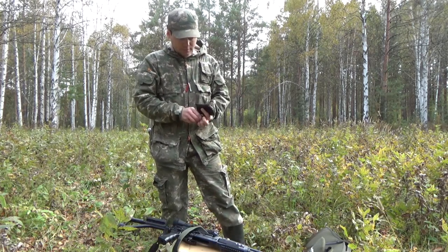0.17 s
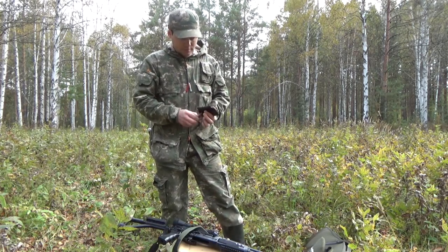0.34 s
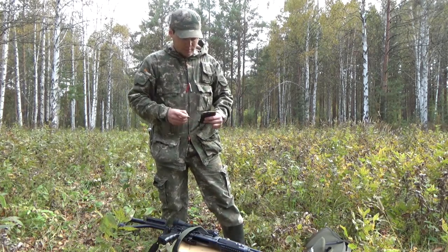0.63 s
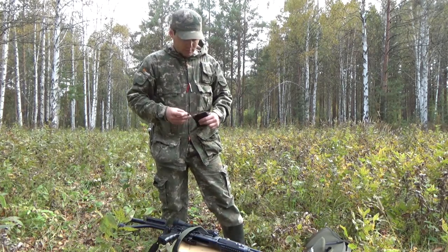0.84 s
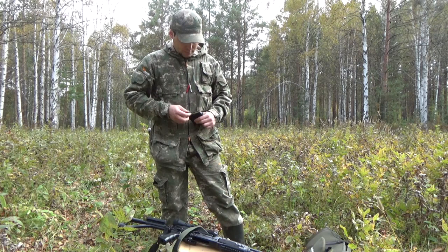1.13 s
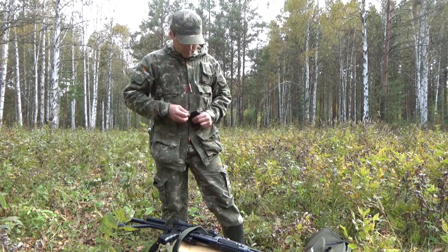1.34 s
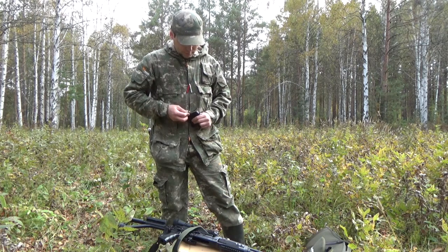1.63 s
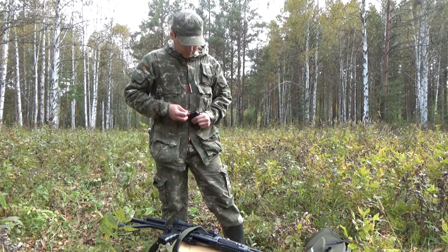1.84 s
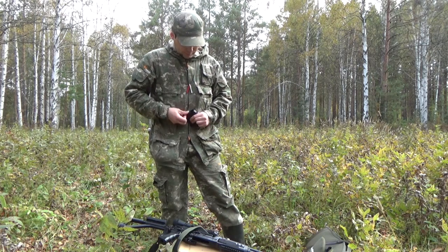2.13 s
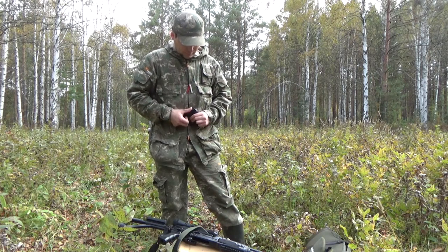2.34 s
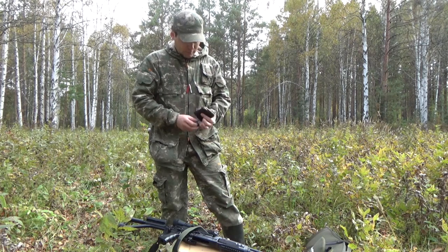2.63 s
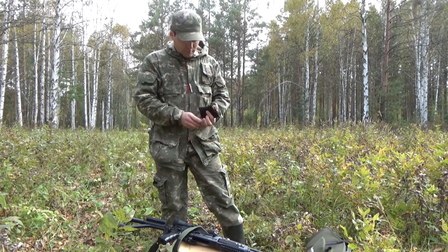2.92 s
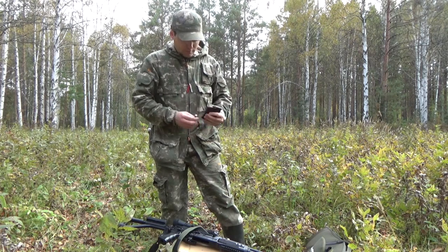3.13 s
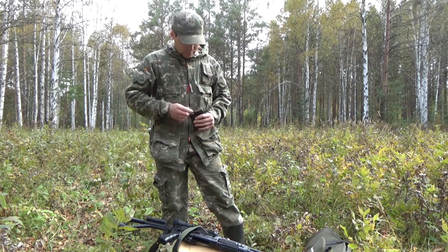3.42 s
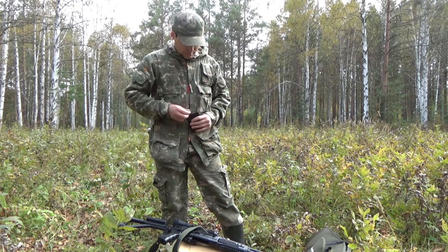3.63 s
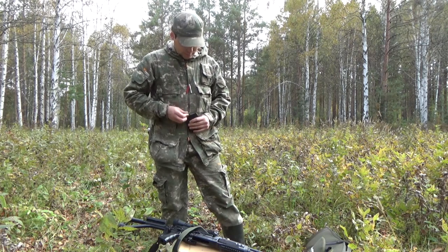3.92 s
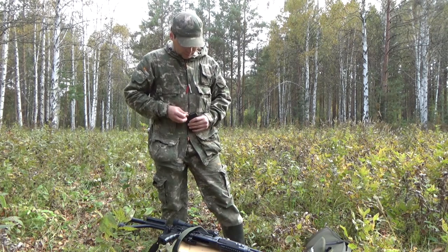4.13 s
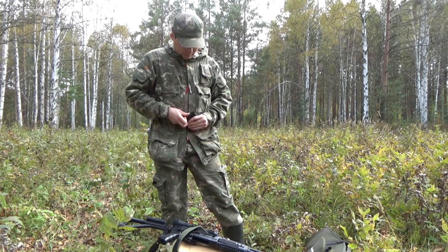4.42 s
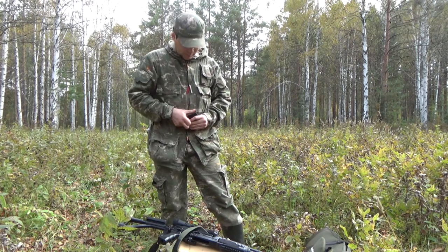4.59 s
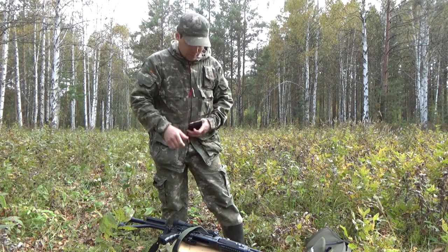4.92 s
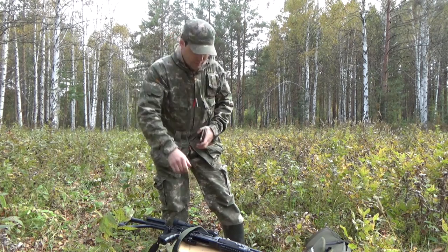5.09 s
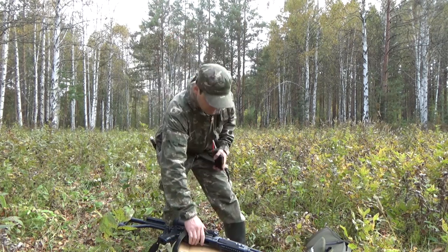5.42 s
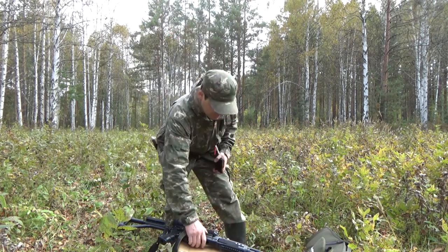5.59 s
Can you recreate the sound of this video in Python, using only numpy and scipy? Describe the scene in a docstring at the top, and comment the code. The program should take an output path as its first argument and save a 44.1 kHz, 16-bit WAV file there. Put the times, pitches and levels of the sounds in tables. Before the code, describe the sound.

A quiet forest clearing in stereo: low, steady, airy tree hush, with a very faint rapid ticking and low hum from the camera itself. Heavy jacket cloth rubs softly. At about 0.2 s a light metal tap and short scrape, then small ticks at 1.3-1.9 s. Around 2.0 s a cartridge scrapes along the magazine lips, and from 2.0 to 2.4 s it snaps home in sharp, dry, tightly damped clicks with slight dull thumps, strongest near 2.2 and 2.4 s, with a brisk sleeve swish. It calms to cloth and barely audible touches until a single bright click at 3.8 s. From 4.2 to 4.7 s the second round goes in: scrapes and a denser run of clacks, peaking around 4.45 s. Small taps follow at 4.9 and 5.0 s, then jacket rustle as the person bends until about 5.6 s. The trees return only a faint scattered tail.

```python
"""Cartridges pressed into a hand-held magazine in a forest clearing, two rounds in all.
Each round taps the lips, scrapes over the round below and snaps home in a quick run of dry clicks.
The clicks are damped metal modes with a noise crack; scrapes and jacket sleeves are grainy, coloured noise.
Steady noise makes the hush of the trees, which answer the metal faintly with scattered, decaying noise.
A camera mechanism ticks very softly through its resonant casing, over a faint hum."""
import sys
import numpy as np
from scipy import signal
from scipy.fft import rfft, irfft, next_fast_len
from scipy.io import wavfile
from scipy.ndimage import uniform_filter1d, map_coordinates

SR = 44100
rng = np.random.default_rng(int(sys.argv[2]) if len(sys.argv) > 2 else 0)


def store_wav(level_fs):
    """Save 16-bit WAV to argv[1]."""
    pcm = np.round(np.clip(np.atleast_2d(level_fs), -1, 1) * 32767)
    wavfile.write(sys.argv[1], SR, pcm.T.astype(np.int16))


N = 253575  # length in samples

# Hush of the trees. Each row: frequency in Hz, relative density in dB per Hz.
TREE_SPECTRUM = [(12, -57), (20, -10), (68, -2), (134, -9), (527, -5), (897, -7.5), (1090, -11.5),
                 (1220, -12.5), (2200, -19.5), (3440, -19), (4420, -16.5), (4810, -24), (5230, -18),
                 (14700, -34.5), (16000, -36)]
# Shading of that hush, with softer deep bass and upper middle. Each row: frequency in Hz, gain in dB.
TREE_SHADE = [(25, -8), (45, -2.0), (900, -3.5), (2500, -2.0), (5000, -5), (9000, -0.5), (14000, 2)]
# Stereo likeness of the hush. Each row: frequency in Hz, left-right correlation (1 is mono).
TREE_LIKENESS = [(30, .998), (70, 1), (130, .92), (280, 0.87), (500, .8), (1000, 0.33), (3000, 0.077),
                 (9000, 1)]

# Movements of the arms and body. Each row: middle in seconds, half length in seconds,
# rub in dB before trim, swish relative to the rub in dB.
SLEEVE_MOVES = [(0.25, 0.27, -64.5, -10), (2.256, 0.26, -61.5, -8.5), (2.398, 0.05, -59, 0.5),
                (2.49, 0.05, -59.5, 1), (2.77, 0.115, -62, -4.5), (4.25, 0.11, -62.5, -10),
                (4.72, 0.18, -60.5, -3), (5.37, 0.09, -66, 7.5), (5.353, 0.5, -62.5, -1.3)]
# Heavy cloth rubbing. Each row: frequency in Hz, relative density in dB per Hz.
RUB_SPECTRUM = [(220, 1), (400, 9.5), (700, -4), (1500, -4), (3500, -3), (5200, -7), (7000, -29)]
# Weave swishing. Each row: frequency in Hz, relative density in dB per Hz.
SWISH_SPECTRUM = [(3500, -18), (6000, -7), (8500, 1), (10500, -3), (12000, -8), (13500, -12), (16000, -23)]
REST_RUB_DB, REST_SWISH_DB = -67, -84  # cloth while only the fingers work, before trim
FOLDS_PER_S = 11  # mean rate of folds brushing past each other
FOLD_S, FOLD_DB = 0.0037, 5  # half length of a fold, and the strongest possible fold over the weave

# Resonances of the camera casing. Each row: frequency in Hz, width in Hz, relative level in dB.
CASING_MODES = [(1103, 54, 3.5), (2430, 51, 0.5), (2970, 120, -1.5), (3410, 230, -0.5), (4690, 67, 2),
                (4865, 31, 3)]

# Cartridge meeting magazine. Each row: start in seconds, strength in dB, pitch of the case in Hz,
# knock on the wall relative to the strength in dB, sharp edge relative to the strength in dB.
CONTACTS = [(0.1579, -44, 2460, -4, -9.5), (0.332, -53.5, 2150, 5, -15), (1.2696, -41, 4360, -14, -4),
            (1.2706, -46.5, 2280, -9, -19), (1.47, -48, 2660, -1, -6.5), (1.6437, -50.5, 3800, -7.5, -10),
            (1.817, -54.5, 2020, -7, -12), (1.8481, -52.5, 3440, 3.5, -10), (1.9764, -39, 3500, -14, -11.5),
            (1.9797, -49.5, 2700, 10.5, -3), (2.05, -44.5, 2800, -2.5, -12), (2.0678, -44, 3000, 1.5, -13),
            (2.182, -24.5, 3790, -23, -5), (2.1823, -25.5, 2850, -24, -32), (2.201, -40.5, 2880, -11, -13),
            (2.288, -47, 2800, -12, -10), (2.296, -31, 2950, -8.5, -5.5), (2.3521, -43.5, 2670, -12, -20),
            (2.3672, -36.5, 2770, -3, -17), (2.3701, -22.5, 2000, -20, -8.5), (2.379, -37.5, 1960, -5, -19),
            (2.402, -54, 2120, 1, -12), (2.4124, -34, 3080, -5.5, -5), (2.7472, -58, 3680, -7, -8),
            (3.1602, -59, 3150, -9, -5), (3.2245, -61, 4340, -2, 1.5), (3.5492, -61, 3260, -9, -2),
            (3.8099, -31.5, 4400, -24, -8.5), (3.8351, -42, 2930, -20, -20),
            (4.2111, -47, 3330, -11.5, -14), (4.2387, -34, 3440, -10, -16), (4.2462, -27, 4050, -16.5, -3),
            (4.2492, -37, 4040, -12, -3), (4.312, -50.5, 4640, -17, -11), (4.352, -57, 4100, -9, -5),
            (4.391, -34.5, 2640, -11, -9), (4.4312, -30.5, 2300, -21.5, -19), (4.445, -26, 4570, -33, -2.5),
            (4.4491, -24, 3730, -21, -9), (4.4797, -39, 3200, -20, -6.5), (4.577, -41, 4900, -22, -16),
            (4.5924, -43, 2180, -10.5, -15), (4.617, -39.5, 1850, -10, -23), (4.6511, -28.5, 2750, -17, -5),
            (4.6682, -49, 2600, 3.5, -10), (4.9241, -52, 2880, -3, -5.5), (5.0313, -49.5, 3380, -26, -16)]
# The stack of rounds sinking on its spring. Each row: start in seconds, level in dB.
STACK_THUMPS = [(1.9805, -46), (2.201, -45), (2.296, -52.5), (2.3699, -54), (2.402, -57), (2.4126, -44.5),
                (4.2386, -49), (4.2498, -49.5), (4.3909, -42), (4.4806, -55), (4.6517, -54), (4.6676, -46)]
# A glancing blow rings the wall higher than a square one. Each row: relative knock in dB, pitch in Hz.
WALL_PITCH = [(-12, 1640), (-4, 1175), (3.5, 1000)]
# A sharper edge rings the feed lip higher. Each row: relative edge in dB, pitch in Hz.
LIP_PITCH = [(-16.5, 5810), (-4, 7450)]
# A harder push holds the metal tighter. Each row: strength in dB, t60 in seconds.
GRIP_DAMPING = [(-64, 0.027), (-49, 0.017), (-25, 0.012)]
# Registers of a contact: thud, knock, clack, clink, snap. Each row: low edge in Hz, high edge in Hz.
REGISTERS = [(270, 540), (760, 1450), (1900, 3150), (3300, 5200), (5900, 12000)]
# Modes of the loaded magazine. Each row: frequency in Hz, relative level in dB,
# life relative to the t60 of the contact.
MAGAZINE_MODES = [(347, 0.5, 1.35), (440, 3.5, 1.34), (672, -3.5, 2.6), (970, -20, 2.1), (1174, -0.5, 1.36),
                  (2045, -1.5, 1.1), (2250, -4, 1.3), (2573, 0, 0.65), (2850, 4, 0.67), (3370, 2, 0.45),
                  (3780, 2, 0.96), (4210, -5, 1.6), (4710, -4, 0.9), (6160, 8, 0.27), (6700, -19, 0.45),
                  (7630, 1.5, 0.97), (8290, 4, 0.87), (9220, 5.5, 0.47), (9900, -5, 1.56),
                  (12000, -20, 0.44)]
# Rings added by wall, case and feed lip. Each row: relative level in dB, life relative to the contact's t60.
TOUCHED_PARTS = [(-3, 1.3), (1, .78), (-1, .6)]
PITCH_SCATTER = 0.074  # relative spread of wall and lip pitch from touch to touch
FALL_DB_PER_OCTAVE = 10.5  # a click is strongest around the pitch of the case
THUD_UNDER_WALL_DB = -15  # the low thud that comes with every knock on the wall
THUMP_T60_S = 0.015

# Answer of the nearby undergrowth. Each row: frequency in Hz, t60 in seconds.
UNDERGROWTH_DECAY = [(200, .08), (3000, 0.088), (12000, 0.092)]
# Answer of the forest. Each row: frequency in Hz, t60 in seconds.
FOREST_DECAY = [(200, 0.64), (2500, 0.97), (12000, 0.31)]

# Brass sliding under the thumb. Each row: start in seconds, catch in seconds,
# peak in dB before smoothing and trim, t60 in seconds.
SCRAPES = [(0.228, 0.279, -56, .04), (1.969, 1.975, -44, .03), (2.021, 2.036, -44.5, 0.11),
           (2.049, 2.066, -40, 0.045), (2.167, 2.194, -40, .12), (2.361, 2.373, -44.5, 0.032),
           (4.202, 4.26, -46, 0.035), (4.365, 4.395, -41, 0.018), (4.556, 4.573, -45, .15),
           (4.58, 4.593, -47.5, 0.028), (4.603, 4.614, -46, .03), (4.645, 4.654, -39.5, .02),
           (4.897, 4.924, -52, .02)]
# Scraping brass. Each row: frequency in Hz, relative density in dB per Hz.
BRASS_SPECTRUM = [(290, -47), (500, -8), (602, 4.5), (1130, 2.5), (1770, 3.5), (2170, 2), (3050, 6.5),
                  (4050, -2.5), (4800, 1), (5230, -3), (6860, -5), (11000, -13), (15000, -24)]
SCRAPE_SWELL_DB = 13  # a scrape swells until the round catches, then dies away

# The hands at the two microphones. Each row: frequency in Hz, left minus right in dB.
LEFT_OVER_RIGHT = [(60, -1), (150, 0.0), (380, 0), (950, 1.5), (2380, 0.0), (5980, 1.5), (15000, 0.5)]
# Phase of the hands. Each row: frequency in Hz, lead of the left side in radians.
LEFT_LEAD = [(0, 0.46), (1890, -0.24), (6630, 0.14), (8180, -0.24), (16400, 0.34)]
TOP_HZ = 15900  # band limit of the whole scene


def amp(db):
    """Decibels to gain."""
    return 10 ** (np.asarray(db) / 20)


def unit(x):
    """Scale to rms 1."""
    return x / np.sqrt(np.mean(x ** 2) + 1e-20)


def along(points, hz):
    """Read (Hz, value) points on a log frequency axis."""
    f, v = np.transpose(points)
    return np.interp(np.log(hz + 1), np.log(f + 1), v)


def wobble(rate):
    """A smooth random curve with the given number of knots a second."""
    knots = rng.standard_normal(int(N * rate / SR) + 4)
    return map_coordinates(knots, [np.arange(N) * rate / SR])


def filtered(x, response):
    """Shape x by a response of frequency."""
    m = next_fast_len(N + SR // 2)
    hz = np.fft.rfftfreq(m, 1 / SR)
    return irfft(rfft(x, m) * response(hz), m)[..., :N]


def air():
    """Steady noise as the hush of distant trees, nearly mono in the bass and widest around 3 kHz."""
    def colour(hz):
        gain = amp(along(TREE_SPECTRUM, hz) + along(TREE_SHADE, hz))
        # this angle between mid and side gives the wanted left-right correlation
        turn = np.arccos(np.clip(along(TREE_LIKENESS, hz), -1, 1)) / 2
        return gain * [np.cos(turn), np.sin(turn)]

    mid, side = filtered(rng.standard_normal((2, N)), colour)
    level = amp(-59.5 + 0.59 * wobble(2.84))
    return level * unit(np.array([mid + side, mid - side]))


def friction(spectrum, grain_db, grain_rate):
    """Coloured noise of rms 1 that catches and slips in tiny grains."""
    slips = rng.standard_normal(N) * amp(grain_db * wobble(grain_rate))
    return unit(filtered(slips, lambda hz: amp(along(spectrum, hz))))


def jacket():
    """Heavy cloth rubs as the arms move; its weave swishes on top and folds brush by in small flurries."""
    t = np.arange(N) / SR
    rub_power, weave_power = amp(REST_RUB_DB) ** 2, amp(REST_SWISH_DB) ** 2
    for middle_s, reach_s, db, swish_db in SLEEVE_MOVES:
        move = amp(db) * np.exp(-.5 * ((t - middle_s) / reach_s) ** 2)
        rub_power = rub_power + move ** 2
        weave_power = weave_power + (amp(swish_db) * move) ** 2
    rub = amp(-1.0) * np.sqrt(rub_power) * friction(RUB_SPECTRUM, grain_db=1.5, grain_rate=200)

    # folds fall evenly along the cloth's travel, so they crowd into brisk moves
    folds = rng.random((round(FOLDS_PER_S * t[-1]), 2))
    travel = np.cumsum(weave_power) / np.sum(weave_power)
    brushing = np.zeros(N)
    for when, size in folds:
        fold_s = np.interp(when, travel, t)
        brushing += amp(FOLD_DB) * size ** 2 * np.exp(-((t - fold_s) / FOLD_S) ** 2)

    weave = amp(-4.0 + 1.0 * wobble(18)) * np.sqrt(weave_power)
    swish = friction(SWISH_SPECTRUM, grain_db=2.0, grain_rate=820)
    return rub + weave * np.hypot(1, brushing) * swish


def camera_mechanism(first_s):
    """Impulses 25 times a second, strong and weak in turn, ring a small casing over a faint hum."""
    t = np.arange(N) / SR
    ticks = np.arange(first_s, t[-1], 1 / 25)
    drive = .015 * rng.standard_normal(N)  # faint hiss between the ticks
    tick_db = -4 * (np.arange(len(ticks)) % 2) + rng.standard_normal(len(ticks))
    drive[(ticks * SR).astype(int)] += amp(tick_db)

    def casing(f):
        return sum(amp(db) * 1j * f * w / (c * c - f * f + 1j * f * w) for c, w, db in CASING_MODES)

    ticking = amp(-69.5) * unit(filtered(drive, casing))
    hum = amp(-73.0 + 3.5 * wobble(8.9)) * np.sin(2 * np.pi * 78 * t + wobble(8.2))
    return ticking + hum


def contact(levels_db, pitches_hz, t60, ring_db, crack_db=8.0, crack_life=0.99):
    """One blow on the magazine: a noise crack and modes that the gripping hand damps at once."""
    t = np.arange(SR // 10) / SR
    # wall, case and feed lip ring at pitches that depend on where they are touched
    rings = [(hz, ring_db + db, life) for hz, (db, life) in zip(pitches_hz, TOUCHED_PARTS)]
    hz, db, life = np.transpose(MAGAZINE_MODES + rings)[:, :, None]
    size, turn = rng.standard_normal((2, len(hz), 1))
    # loose rounds chatter against each other and blur every pitch
    chatter = .075 * np.cumsum(rng.standard_normal((len(hz), len(t))), axis=1) / SR
    fade = amp(db + 1.3 * size - 60 * t / (t60 * life))
    modes = fade * np.sin(2 * np.pi * hz * (t + chatter) + turn)
    crack = amp(crack_db - 60 * t / (t60 * crack_life)) * rng.standard_normal(len(t))
    blow = modes.sum(0) + crack

    out = np.zeros(len(t))
    for band, level_db in zip(REGISTERS, levels_db):
        sos = signal.butter(3, band, "bandpass", fs=SR, output="sos")
        part = signal.sosfilt(sos, blow)
        # equal energy per register: that of rms 1 held for 10 ms
        out += amp(level_db) * part * np.sqrt(SR / 100 / np.sum(part ** 2))
    return out


def clicks():
    """Cartridges tap the lips, slip past them and seat against the back wall; the stack thumps as it sinks."""
    out = np.zeros(N + SR)
    middle_hz = np.sqrt(np.prod(REGISTERS[2:4], axis=1))  # centres of clack and clink
    for s, db, case_hz, wall_db, edge_db in CONTACTS:
        clack_db, clink_db = db - FALL_DB_PER_OCTAVE * np.abs(np.log2(middle_hz / case_hz))
        knock_db = db + wall_db
        levels_db = [knock_db + THUD_UNDER_WALL_DB, knock_db, clack_db, clink_db, db + edge_db]
        wall_hz = np.interp(wall_db, *np.transpose(WALL_PITCH))
        lip_hz = np.interp(edge_db, *np.transpose(LIP_PITCH))
        stray = np.exp(PITCH_SCATTER * rng.standard_normal(2))
        pitches_hz = [wall_hz * stray[0], case_hz, lip_hz * stray[1]]
        t60 = np.interp(db, *np.transpose(GRIP_DAMPING))
        hit = contact(levels_db, pitches_hz, t60, ring_db=8.0)
        out[round(s * SR):][:len(hit)] += hit
    for s, db in STACK_THUMPS:
        hit = contact([db], [], THUMP_T60_S, ring_db=9.5)  # thud register only
        out[round(s * SR):][:len(hit)] += hit
    return out[:N]


def scatter(x, decay, delay_s, width):
    """Diffuse stereo answer of the surroundings: noise in which each frequency dies at its own speed."""
    hz, t, z = signal.stft(rng.standard_normal((2, SR)), SR, nperseg=256)
    fade = amp(-60 * t / along(decay, hz)[:, None])
    mid, side = signal.istft(z * fade, SR, nperseg=256)[1]
    tail = np.array([mid + width * side, mid - width * side])
    late = np.pad(x, (int(delay_s * SR), 0))
    return signal.fftconvolve(late[None], tail / np.linalg.norm(tail[0]), axes=1)[:, :N]


def scrapes():
    """A case slides over the round below, louder as the thumb bears down."""
    t, pressure = np.arange(N) / SR, np.zeros(N)
    for start, catch, db, t60 in SCRAPES:
        swell_db = np.interp(t, [start, catch], [-SCRAPE_SWELL_DB, 0])
        fade_db = -60 * np.maximum(t - catch, 0) / t60
        pressure += amp(db + swell_db + fade_db) * (t > start)
    smooth = uniform_filter1d(pressure, size=90)  # softens the edges over 2 ms
    return amp(-2.0) * smooth * friction(BRASS_SPECTRUM, grain_db=1.5, grain_rate=490)


def placed(x):
    """A source ahead reaches the two microphones with slightly different level and phase."""
    sides = np.array([[.5], [-.5]])

    def response(hz):
        level = amp(sides * along(LEFT_OVER_RIGHT, hz))
        return level * np.exp(1j * sides * along(LEFT_LEAD, hz))

    return filtered(x, response)


def scene():
    """The hands work ahead; undergrowth and forest answer the metal amid tree hush and camera ticks."""
    metal = clicks() + scrapes()
    near = amp(-21.5) * scatter(metal, UNDERGROWTH_DECAY, delay_s=0.0039, width=0.36)
    far = amp(-32.0) * scatter(metal, FOREST_DECAY, delay_s=0.026, width=0.37)
    hands = placed(metal + jacket())
    return hands + near + far + air() + camera_mechanism(first_s=0.0071)


def record(dry):
    """The camera keeps nothing above its band limit."""
    return filtered(dry, lambda hz: hz < TOP_HZ)


dry = scene()
out = record(dry)
store_wav(out)
```